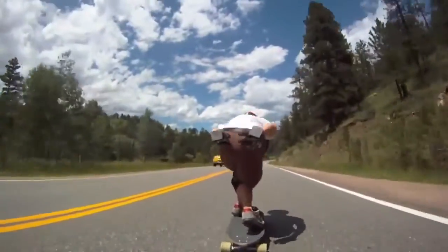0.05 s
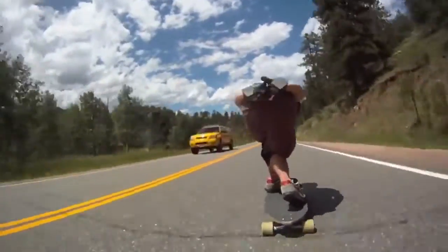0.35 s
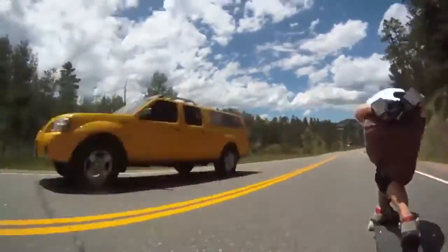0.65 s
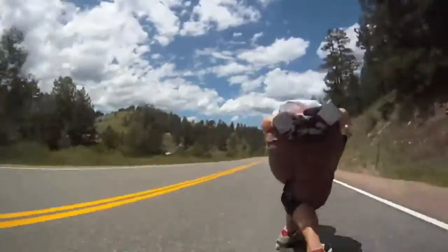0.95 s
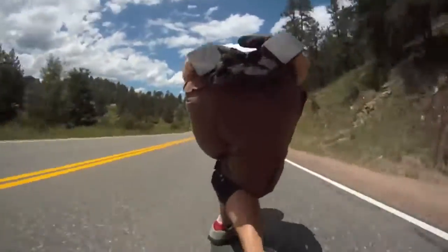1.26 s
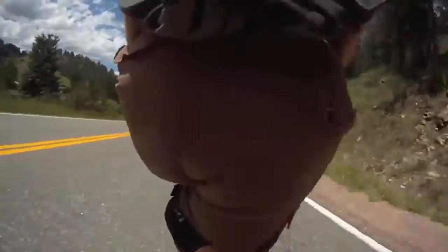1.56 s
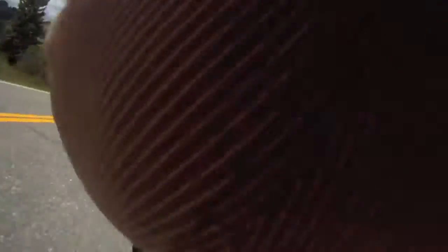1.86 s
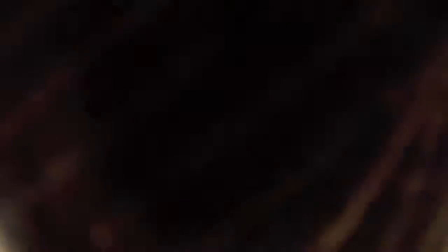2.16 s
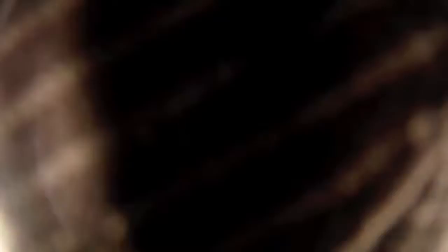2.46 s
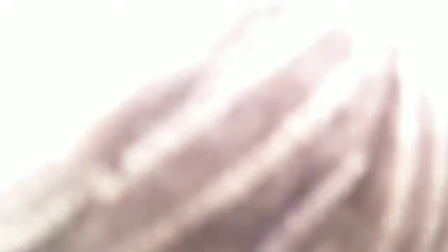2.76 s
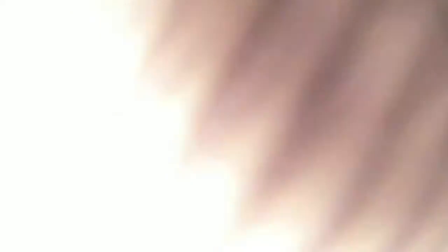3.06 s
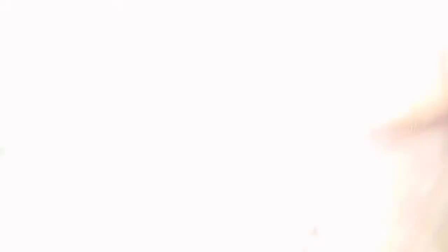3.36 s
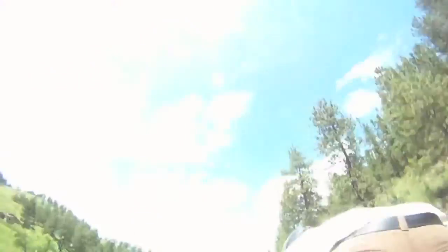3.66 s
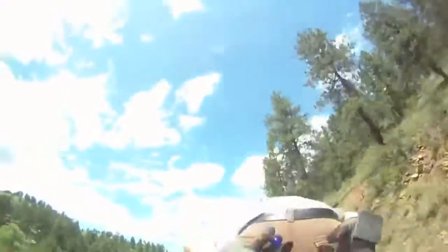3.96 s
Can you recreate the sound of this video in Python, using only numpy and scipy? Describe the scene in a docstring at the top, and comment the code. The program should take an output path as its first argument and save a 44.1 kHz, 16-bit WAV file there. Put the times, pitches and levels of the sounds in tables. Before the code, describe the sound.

Wind rumbles and thumps on the microphone during a fast longboard ride, briefly howling.

```python
"""A camera rides down an asphalt road at speed, close behind a longboarder. From the start, turbulent wind
buffets the microphone over the hiss of wheels and air; the road jolts, and hard gusts make a limiter duck
everything. Grit ticks on the housing, and at 0.74 s a pebble rings it. From about 1.8 to 3.3 s, close to
the rider's body, the flow excites air resonances in a hollow howl, with the hardest gust at 2.8 s.
Then the howl falls away, a low roar swells, and the air gives one faint whistle."""
import sys
import numpy as np
from scipy import signal
from scipy.fft import rfft, irfft
from scipy.io import wavfile

SR = 44100
rng = np.random.default_rng(int(sys.argv[2]) if len(sys.argv) > 2 else 0)


def transcribe(u):
    """Save the signal u as a 16-bit wav file named by the first command-line argument.

    u: samples, shape (n,) or (channels, n), limited to [-1, 1]; the rate is SR.
    q: integer samples, one column per channel.
    """
    v = np.clip(np.atleast_2d(u).T, -1, 1)
    q = np.round(v * 32767).astype(np.int16)
    wavfile.write(sys.argv[1], SR, q)


N = 176400
T = np.arange(N) / SR

# Relative noise spectra: frequency_hz, density_db
BUFFET_SPECTRUM = [(10, -10), (22, -0.5), (40, 2.5), (65, 3), (100, 1), (160, -7), (250, -13.5), (450, -21),
                   (700, -34), (1500, -66)]  # low turbulence
ROAR_SPECTRUM = [(60, -48), (150, 0), (260, 2), (400, -7), (520, -7), (680, -20), (1200, -28.5),
                 (2500, -50)]  # low-mid turbulence
RUSH_SPECTRUM = [(200, -28), (700, -6), (1250, 2), (1550, -1.5), (2000, -3.5), (2500, 0), (3150, 2),
                 (3450, -0.5), (3750, -9), (4150, -8.5), (4800, -1), (5400, -8.5), (5800, -23.5),
                 (6050, -36), (6500, -12.5), (7200, -4), (8050, -16.5), (8800, -7), (9600, -12.5),
                 (10200, -18.5), (11200, -18.5), (12100, -21), (12800, -23), (14000, -16), (15200, -14)]  # wheels and air, heard through the housing
WAKE_SPECTRUM = [(300, -20), (600, 4.5), (900, 4), (1150, 1.5), (1500, -6.5), (1900, -2), (2200, 0.5),
                 (2700, 2.5), (3300, 0), (3600, -7), (3930, -2.5), (4300, -8), (4800, -5), (5400, -12.5),
                 (6000, -30), (6700, -12), (7300, -9.5), (8100, -13.5), (8500, -10), (9300, -7.5),
                 (10300, -19), (11500, -13), (13500, -17.5), (15100, -12.5)]  # flow close behind the rider
JOLT_SPECTRUM = [(70, -4), (160, 2), (300, -0.5), (480, -1), (700, -22), (1100, -21.5), (2000, -40)]  # the shaken camera
# Envelopes of the noise layers and the howl: time_s, level_db
BUFFET_LEVELS = [(0, -18.5), (.4, -16.5), (.9, -15.5), (1.4, -17), (2, -18.5), (2.6, -17), (3.1, -17),
                 (3.4, -15), (4, -13)]
ROAR_LEVELS = [(0, -23), (.3, -28), (.45, -21), (.65, -27.5), (.9, -24.5), (1.3, -25.5), (1.6, -26),
               (2, -30.5), (2.6, -29), (3.3, -30), (3.55, -17), (3.7, -23), (3.85, -16), (4, -25)]
RUSH_LEVELS = [(0, -28), (.1, -31.5), (.22, -27), (.32, -31.5), (.45, -25.5), (.6, -28), (.72, -28),
               (.8, -32.5), (1, -32.5), (1.12, -29.5), (1.25, -30), (1.42, -32.5), (1.62, -36), (1.95, -25),
               (2.3, -39), (3.1, -33), (3.4, -39), (3.62, -33.5), (3.82, -33.5), (4, -38)]
WAKE_LEVELS = [(0, -54), (1.55, -36), (1.7, -39), (1.85, -28.5), (1.92, -30.5), (2, -22.5), (2.06, -24.5),
               (2.15, -33), (2.28, -27), (2.4, -28), (2.52, -29), (2.58, -27.5), (2.67, -26.5),
               (2.76, -25.5), (2.86, -31), (2.95, -26.5), (3.04, -19.5), (3.13, -30.5), (3.26, -28),
               (3.34, -44.5), (4, -36.5)]
HOWL_LEVELS = [(0, -49), (1.4, -32), (1.62, -25.5), (1.75, -23.5), (1.86, -15.5), (1.92, -18.5),
               (2.02, -14.5), (2.12, -18.5), (2.28, -17), (2.4, -19), (2.55, -21.5), (2.66, -20.5),
               (2.75, -14.5), (2.88, -21), (3.03, -20.5), (3.1, -19.5), (3.2, -15.5), (3.28, -20.5),
               (3.36, -43), (3.55, -39), (4, -31)]
# Pressure pulses on the microphone: peak_s, level_db, half_width_s
GUST_PULSES = [(0.066, 0, 0.0036), (0.078, -0.5, 0.0017), (0.236, 1.5, 0.0027), (.291, -4, 0.0025),
               (0.459, 2.5, 0.0019), (.580, 1, 0.0021), (0.666, -4.5, .003), (.714, -10, .002),
               (.729, -5.5, 0.0015), (0.745, -6, 0.0016), (.863, -0.5, 0.0024), (0.938, 0, 0.0016),
               (0.964, -2, 0.0019), (1.064, -12, 0.0033), (1.138, 0.5, 0.0029), (1.191, 1, 0.0045),
               (1.315, 4, 0.0034), (1.429, -1.5, 0.0041), (1.576, -8, 0.0025), (1.626, -5, 0.0035),
               (1.87, 1, 0.005), (2.064, 9.5, 0.0029), (2.316, 5.5, 0.0021), (2.465, -1.5, 0.0037),
               (2.614, 0.5, 0.0042), (2.789, 15, 0.0022), (3.113, -7, 0.0029), (3.287, 0, 0.0039),
               (3.439, -5.5, 0.0025), (3.666, 2.5, 0.0012), (3.774, 1, 0.0013), (3.859, 4.5, .003)]
# Hollow air resonances: pitch_hz, width_hz, level_db
AIR_RESONANCES = [(456.8, 34, -0.5), (510, 50, -2.5), (366, 92, -6), (744, 85, -8.5), (1180, 120, -19.5),
                  (3950, 14, -34.5), (8070, 14, -33)]
# Bumps in the road: centre_s, level_db, half_length_s
ROAD_BUMPS = [(0.291, -6.5, 0.0035), (0.447, -18, 0.013), (.580, -29, 0.0051), (.855, -19, 0.01),
              (0.941, -28, .004), (1.15, -16, 0.0064), (1.571, -20.5, .006), (3.044, -10, 0.0086),
              (3.549, -17, 0.0037), (3.658, -13, 0.0081), (3.777, -18, 0.0054)]
# Normal modes of the housing: pitch_hz, level_db, t60_s
HOUSING_MODES = [(630, -13.5, 0.016), (965, -9, 0.018), (1540, -2, 0.0087), (2070, -0.5, 0.0087),
                 (2770, -10.5, .007), (9730, -14, 0.0049), (13900, -15, .007)]
# Sprays of fine grit: start_s, level_db
GRIT_SPRAYS = [(.289, -33), (0.7376, -12), (2.004, -17), (2.564, -15), (2.7527, -4.5), (2.842, -15),
               (3.042, -21)]


def wind(eddies):
    """Turbulent pressure on the microphone makes a buffet and a roar that flutter with the eddies."""
    buffet = turbulence(BUFFET_SPECTRUM, BUFFET_LEVELS, flutter_db=1.88 * eddies)
    roar = turbulence(ROAR_SPECTRUM, ROAR_LEVELS, flutter_db=2.04 * eddies)
    return buffet + roar


def gusts():
    """Each gust is a steep pressure front: suction snaps over into one hard push."""
    lead, edge, spread = 0.916, .3, 1.97  # in half widths
    suction_ratio = 0.52
    pressure = np.zeros(N)
    for peak_s, db, half_width_s in GUST_PULSES:
        past_front = (T - peak_s) / half_width_s + lead
        pulse = np.tanh(past_front / edge) * np.exp(-(past_front / spread) ** 2)
        pressure += amp(db) * pulse * np.where(past_front < 0, suction_ratio, 1)
    return highpass(pressure, hz=12)


def howl(eddies):
    """Forced resonance: broadband turbulence drives the air, which responds in a few narrow bands."""
    hz, ringing = np.fft.rfftfreq(N, 1 / SR), np.zeros(N)
    for pitch_hz, width_hz, db in AIR_RESONANCES:
        drive = rfft(rng.standard_normal(N) * amp(1.15 * eddies))
        response = 1 / (1 + 1j * (hz - pitch_hz) / width_hz) ** 2
        ringing += amp(db) * unit(irfft(drive * response, N))
    return level(HOWL_LEVELS) * unit(ringing)


def hiss(eddies, fine_eddies):
    """Wheels, air and the rider's wake give broadband noise, modulated by eddies of two scales."""
    rush = turbulence(RUSH_SPECTRUM, RUSH_LEVELS, flutter_db=.9 * eddies + 1.1 * fine_eddies)
    wake = turbulence(WAKE_SPECTRUM, WAKE_LEVELS, flutter_db=.58 * eddies + 1.26 * fine_eddies)
    return rush + wake


def jolts():
    """Structure-borne sound: bumps in the road shake the camera in short, dull bursts."""
    bursts = sum(amp(db) * np.exp(-((T - s) / half_s) ** 2) for s, db, half_s in ROAD_BUMPS)
    return bursts * colour(rng.standard_normal(N), JOLT_SPECTRUM)


def pebble(start_s=.7378, strength_db=6):
    """An impact excites the housing's normal modes, each a damped sinusoid."""
    age_s = np.maximum(T - start_s, 0)
    ringing = np.zeros(N)
    for k, (hz, db, t60_s) in enumerate(HOUSING_MODES):
        decay = np.exp(-np.log(1000) * age_s / t60_s)
        ringing += (-1) ** k * amp(strength_db + db) * decay * np.sin(2 * np.pi * hz * age_s)
    return ringing


def grit(rise_s=0.00043, decay_s=0.0024):
    """Brief impacts have broad spectra: grit ticks on the housing, coloured like the wake's hiss."""
    bursts = sum(amp(db) * np.clip((T - s) / rise_s, 0, 1) * np.exp(-abs(T - s) / decay_s)
                 for s, db in GRIT_SPRAYS)
    return bursts * colour(rng.standard_normal(N), WAKE_SPECTRUM)


def whistle(start_s=3.71, length_s=.06, pitch_hz=2610, level_db=-35):
    """A brief tone in the airflow wavers by random frequency modulation."""
    cycles = np.cumsum(pitch_hz * (1 + .008 * wander(rate_hz=120))) / SR
    swell = np.sin(np.pi * np.clip((T - start_s) / length_s, 0, 1))
    return amp(level_db) * swell * np.sin(2 * np.pi * cycles)


def turbulence(spectrum, levels, flutter_db):
    """Amplitude-modulated noise, shaped by a spectrum and a slow envelope."""
    return level(levels) * colour(rng.standard_normal(N) * amp(flutter_db), spectrum)


def wander(rate_hz):
    """Band-limited random fluctuation, rolling off above the rate, at rms 1."""
    hz = np.fft.rfftfreq(N, 1 / SR)
    band = hz / (hz + rate_hz / 8) * np.exp(-(hz / rate_hz) ** 2)
    return unit(irfft(rfft(rng.standard_normal(N)) * band, N))


def colour(x, spectrum):
    """Filtering by a spectrum interpolated in log frequency, to rms 1."""
    hz, db = np.transpose(spectrum)
    gain = amp(np.interp(np.log(np.fft.rfftfreq(N, 1 / SR) + 1), np.log(hz), db))
    return unit(irfft(rfft(x) * gain, N))


def highpass(x, hz):
    """A first-order filter: 6 dB per octave of loss below the cutoff."""
    return signal.sosfilt(signal.butter(1, hz, "high", fs=SR, output="sos"), x)


def smooth(x, seconds):
    """Gaussian running mean over about that time."""
    bell = np.exp(-(np.arange(-1000, 1001) / (seconds * SR / 2)) ** 2)
    return signal.fftconvolve(x, bell / bell.sum(), "same")


def level(points):
    """Gain over time, interpolated in decibels."""
    return amp(np.interp(T, *np.transpose(points)))


def amp(db):
    """Decibels to amplitude ratio."""
    return 10 ** (np.asarray(db) / 20)


def unit(x):
    """Normalisation to rms 1."""
    return x / np.sqrt(np.mean(x ** 2) + 1e-20)


def scene():
    """The sources superpose; wind, hiss and howl share the same eddies, so they flutter together."""
    eddies, fine_eddies = wander(rate_hz=52), wander(rate_hz=860)
    ride = wind(eddies) + gusts() + hiss(eddies, fine_eddies) + jolts()
    return (ride + howl(eddies) + pebble() + grit() + whistle())[None]


def record(dry):
    """Limiting ducks the peaks and saturation rounds them; faint sidebands and a band limit follow."""
    threshold_db, ceiling = -7, 1.4
    detect_s, attack_s, release_s = 0.0013, 0.0045, 0.097
    carrier_hz, sideband_db, cutoff_hz = 12000, -28, 15550
    x = dry[0]
    envelope_db = 20 * np.log10(abs(smooth(abs(x), detect_s)) + 1e-9)
    excess_db = np.maximum(envelope_db - threshold_db, 1e-6)
    # The gain reduction decays exponentially until a greater excess renews it.
    reduction_db = np.exp(np.maximum.accumulate(np.log(excess_db) + T / release_s) - T / release_s)
    ducked = x * amp(-smooth(reduction_db, attack_s))
    rounded = ceiling * np.tanh(ducked / ceiling)
    rounded -= rounded.mean()
    # Ring modulation leaves a faint image of the mids in the treble.
    sidebands = 2 * amp(sideband_db) * highpass(rounded, hz=500) * np.cos(2 * np.pi * carrier_hz * T)
    lowpass = signal.firwin(511, cutoff_hz, window=("kaiser", 9), fs=SR)
    return signal.oaconvolve(rounded + sidebands, lowpass, "same")[None]


dry = scene()
out = record(dry)
transcribe(out)
```